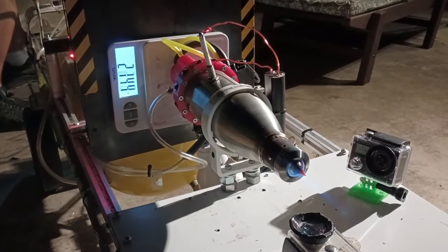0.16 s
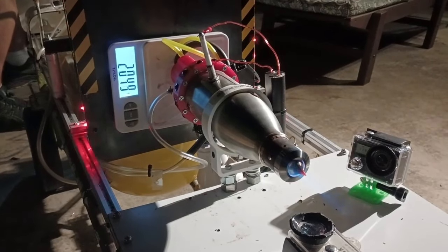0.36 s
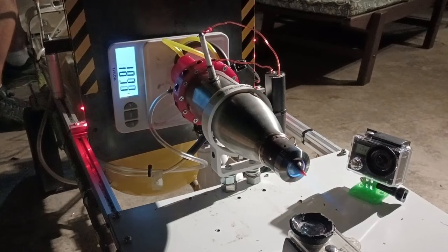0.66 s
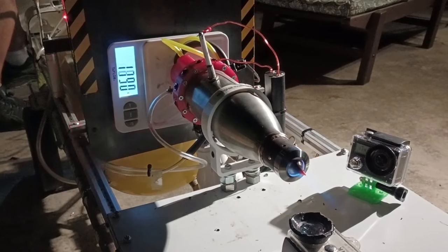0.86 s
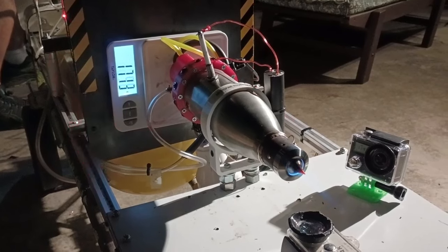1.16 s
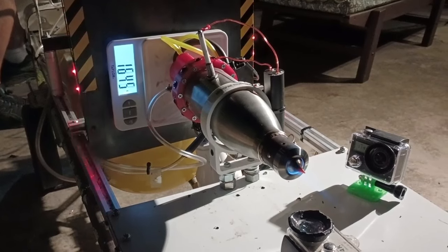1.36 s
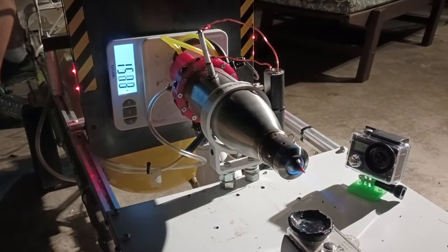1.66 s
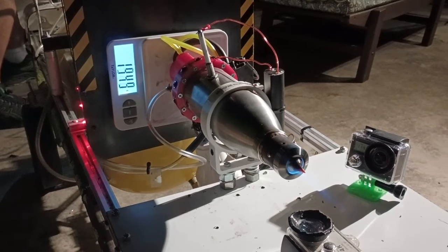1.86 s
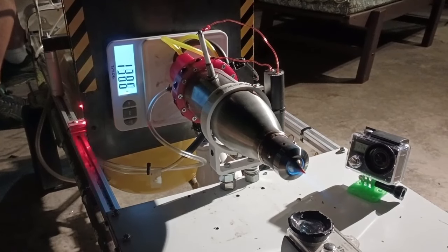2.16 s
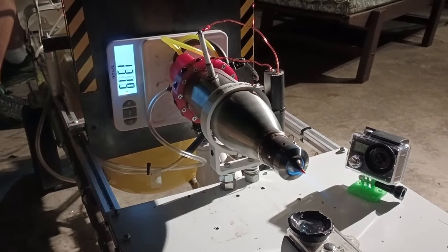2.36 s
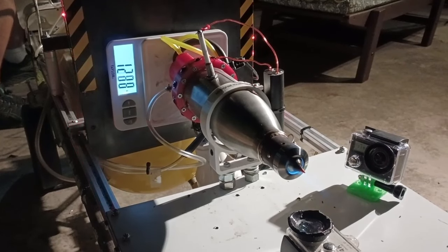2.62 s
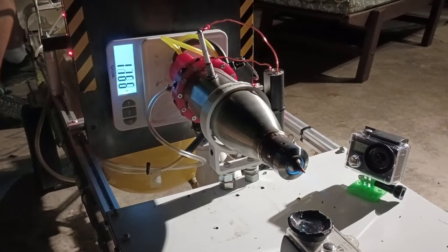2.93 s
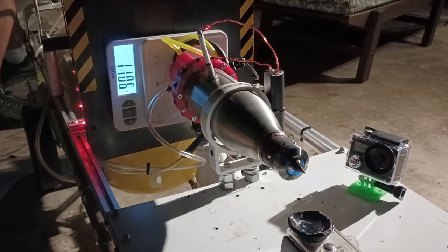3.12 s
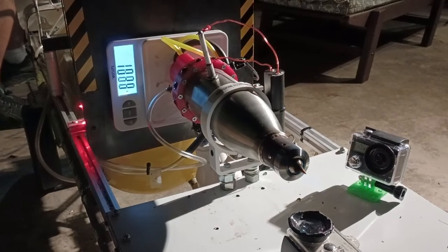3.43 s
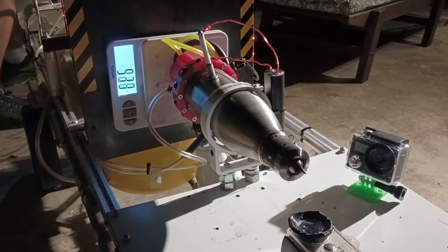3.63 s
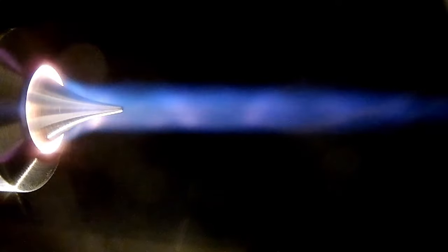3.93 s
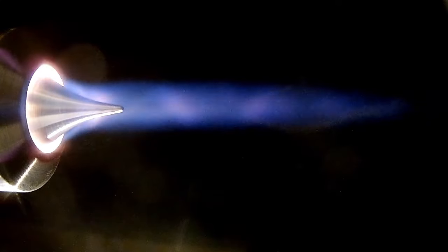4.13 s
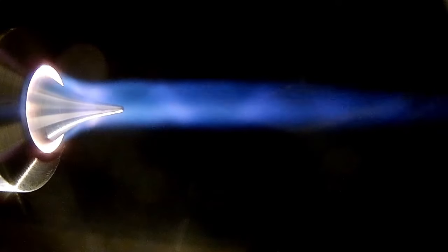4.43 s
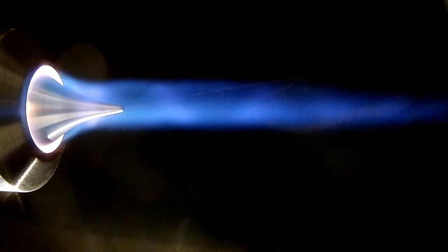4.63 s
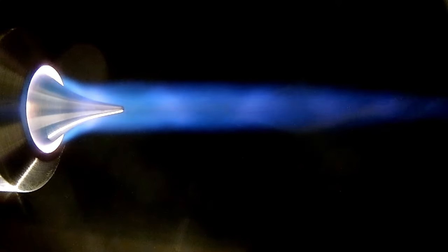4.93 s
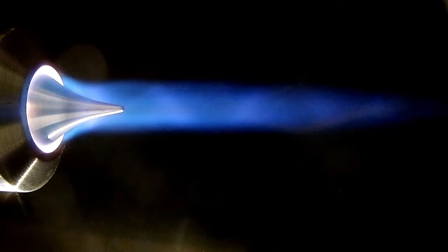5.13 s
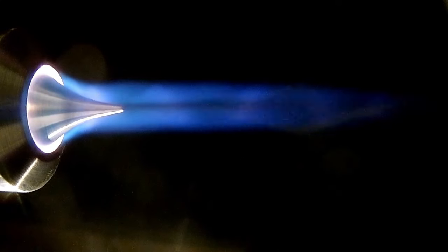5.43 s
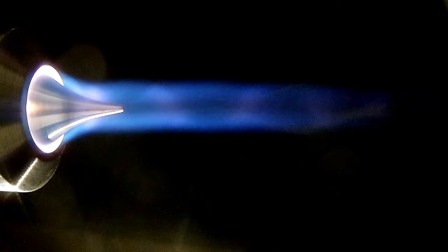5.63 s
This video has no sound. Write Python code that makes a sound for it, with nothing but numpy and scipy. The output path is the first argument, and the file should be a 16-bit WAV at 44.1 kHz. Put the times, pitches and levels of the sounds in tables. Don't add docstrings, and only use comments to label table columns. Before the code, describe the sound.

From 0 to about 3.1 seconds a small rocket engine burns steadily very close to the microphone: a dense, harsh, bright hiss, strongest around six kilohertz, rough with overload and spread across stereo. From 3.1 it flares louder, then at about 3.35 coughs with a small low thump and collapses quickly into a thinning hiss. Near 3.5 the feed line spits a faint spurt and then a strong short puff. Between 3.56 and 3.62 four tiny cooling-metal ticks sound over a quiet whistling gas leak, soft yard noise and a far slow motor beating. At 3.86 everything cuts to near silence. At 3.94 a second firing enters abruptly with a low jolt on the left: a loud, deep, wide, slowed-down roar with no treble, swaying slightly and holding almost constant to 6 seconds, with a few faint isolated specks, clearest near 4.4 and 5.3.

```python
import sys
import numpy as np
from scipy import signal
from scipy.fft import rfft, irfft, next_fast_len
from scipy.io import wavfile
from scipy.ndimage import uniform_filter1d, map_coordinates

SR = 44100
rng = np.random.default_rng(int(sys.argv[2]) if len(sys.argv) > 2 else 0)


def decibels_to_gain(level_db):
    exponent = np.asarray(level_db, float) / 20
    return 10 ** exponent


def persist_wave(psi):
    counts = np.round(np.clip(psi, -1, 1) * 32767).astype(np.int16)
    wavfile.write(sys.argv[1], SR, np.atleast_2d(counts).T)


N = 254898
CAMERA_TOP_HZ = 15740


def unit(x):
    return x / np.sqrt(np.mean(x ** 2) + 1e-20)


def along(points, hz):
    f, *cols = np.transpose(points)
    return np.squeeze([np.interp(np.log(hz + 1), np.log(f + 1), c) for c in cols])


def filtered(x, response):
    m = next_fast_len(N + SR // 4)
    return irfft(rfft(x, m) * response(np.fft.rfftfreq(m, 1 / SR)), m)[..., :N]


def wobble(every):
    knots = rng.standard_normal(N // every + 4)
    return map_coordinates(knots, [np.arange(N) / every])


def patchy(depth_db):
    z = signal.stft(rng.standard_normal((2, N)), nperseg=512)[2]
    field = uniform_filter1d(rng.standard_normal(z.shape[1:]), size=8, axis=0)
    field = uniform_filter1d(field, size=6, axis=1)
    return signal.istft(z * decibels_to_gain(depth_db * unit(field)), nperseg=512)[1][:, :N]


def at_ports(spectrum, ports, depth_db):
    def mix(hz):
        alike, lead, tilt_db = along(ports, hz)
        alike = np.clip(alike, 0, 1)
        level_db = along(spectrum, hz)
        left = decibels_to_gain(level_db + tilt_db / 2)
        right = decibels_to_gain(level_db - tilt_db / 2)
        return np.array([left, right * alike * np.exp(1j * lead), right * np.sqrt(1 - alike ** 2)])
    left, shared, own = filtered(patchy(depth_db)[[0, 0, 1]], mix)
    return np.array([left, shared + own])


def split(x, edge_hz):
    low = filtered(x, lambda hz: 1 / (1 + (hz / edge_hz) ** 6))
    return unit(low), unit(x - low)


def overload(x, top, hard):
    return x / (1 + np.abs(x / top) ** hard) ** (1 / hard)


FLARE_S, SHUT_S = 3.13, 3.35


def jet_level(offset_db, flare_share, early_s, fall_share, late_s):
    t = np.arange(N) / SR
    line_db = -16
    flare_db = 6.5 * np.clip((t - FLARE_S) / (SHUT_S - early_s - FLARE_S), 0, 1) ** 1.5
    shut = np.clip(t - SHUT_S - late_s, 0, None)
    pressure = decibels_to_gain(-260 * shut) + decibels_to_gain(line_db - 70 * shut)
    fall_db = 20 * np.log10(pressure / (1 + decibels_to_gain(line_db)))
    dry_db = -450 * np.clip(t - 3.545, 0, .2)
    return -42.5 + offset_db + flare_share * flare_db + fall_share * (fall_db + dry_db)


# (frequency [Hz], level per Hz [dB])
JET_SPECTRUM = [(35, -60), (60, -33), (90, -18), (160, -11.5), (900, -12.5), (2300, -10.5), (3500, -6.5),
                (4700, -4.5), (6200, 0.5), (7300, -4), (7900, -9.5), (10000, -13), (13300, -20),
                (14800, -9), (15800, -9.5)]
# (frequency [Hz], likeness [0-1], right port's lead [rad],
# left over right [dB])
JET_PORTS = [(1000, 0.06, 1, 0), (2000, 0.13, -0.5, 0), (3150, 0.3, 1.24, -2.5), (4100, .62, 1.5, 4.5),
             (6400, 0.73, 3, 2.5), (7430, 0.55, 3.5, 4), (8500, 0.41, 4, 0.5), (10000, 0.3, 3.5, -3),
             (13000, .1, 3.5, 1), (15500, 0.11, 2.5, -3)]


def first_firing():
    flow = overload(unit(at_ports(JET_SPECTRUM, JET_PORTS, depth_db=1.33)), top=2.0, hard=4)
    rumble, rest = split(flow, edge_hz=2280)
    jet, fizz = split(rest, edge_hz=7480)
    jet_db = jet_level(3.93, flare_share=1, early_s=0, fall_share=0.94, late_s=0)
    rumble_db = jet_level(-7.0, flare_share=0.69, early_s=0.1, fall_share=0.78, late_s=0)
    fizz_db = jet_level(2.0, flare_share=-0.66, early_s=-0.17, fall_share=0.6, late_s=-0.02)
    thin_treble = decibels_to_gain(-70.5)
    return decibels_to_gain(jet_db) * jet + decibels_to_gain(rumble_db) * rumble + (decibels_to_gain(fizz_db) + thin_treble) * fizz


# (resonance [Hz], width [Hz], level [dB])
LEAK_PIPE = [(3820, 500, -2.5), (4270, 60, 0), (5510, 350, -1.5), (8300, 200, -32), (9300, 212, -22)]
# (frequency [Hz], level per Hz [dB])
YARD_SPECTRUM = [(40, -3), (300, 0.5), (1200, 1.5), (2000, -4.5), (3000, -1), (7500, -7.5), (11000, -21),
                 (14000, -20), (15500, -14.5)]
# (frequency [Hz], level [dB])
MOTOR_ORDERS = [(28, -105), (83, -83), (140, -83.5), (167, -84), (194, -75), (230, -77.5), (330, -85),
                (500, -82), (1000, -86.5), (1500, -105)]


def background():
    t = np.arange(N) / SR

    def pipe(f):
        modes = sum(decibels_to_gain(db) * f * w / np.hypot(c * c - f * f, f * w) for c, w, db in LEAK_PIPE)
        return modes ** 2.2

    leak = decibels_to_gain([[-56], [-64]]) * unit(filtered(patchy(.6), pipe))
    yard = decibels_to_gain(-68) * unit(filtered(patchy(2.5), lambda hz: decibels_to_gain(along(YARD_SPECTRUM, hz))))

    hz = 27.8 * np.arange(1, 55)[:, None]
    sizes = decibels_to_gain(along(MOTOR_ORDERS, hz[:, 0]) - 1.0 + rng.normal(0, 1.66, len(hz)))
    phase = 2 * np.pi * hz * (t[::8] - 3.6795) + rng.normal(0, .9, hz.shape)
    beat = signal.resample_poly(sizes @ np.cos(phase), 8, 1)[:N]
    motor = np.array([beat, np.roll(beat, 18)])

    duck_db, open_db = -4.5, 1.4
    recovery = np.clip((t - 3.63) / .045, 0, 1)
    return decibels_to_gain(duck_db + (open_db - duck_db) * recovery) * (leak + yard + motor)


def thump():
    t = np.arange(N) / SR - 3.308
    return decibels_to_gain(-49) * np.exp(-(t / .009) ** 2) * np.sin(2 * np.pi * 115 * t)


# (frequency [Hz], level per Hz [dB])
LAST_GAS_SPECTRUM = [(100, -21), (400, -8.5), (1500, -8.5), (2500, -5), (4000, -2.5), (6200, 8),
                     (7600, -9.5), (10000, -16), (13000, -23), (15000, -18)]
# (time [s], peak level [dB], hold [s])
SPURTS = [
    (3.492, -55, .002),
    (3.519, -38.5, .008),
]


def last_gas():
    t = np.arange(N) / SR
    gain = decibels_to_gain(-70 - 130 * np.clip(t - 3.64, 0, None)) * (t > SHUT_S)
    for s, db, hold in SPURTS:
        rise_db = 6000 * np.clip(s - t, 0, .1)
        fall_db = 900 * np.clip(t - s - hold, 0, .2)
        gain = gain + decibels_to_gain(db - rise_db - fall_db)
    sputter_db = 2.5 * wobble(every=100)
    return gain * decibels_to_gain(4.5 + sputter_db) * unit(at_ports(LAST_GAS_SPECTRUM, JET_PORTS, depth_db=1.2))


# (frequency [Hz], level [dB], 60 dB decay [s])
NOZZLE_MODES = [(6360, -7, 0.035), (5900, -9, 0.019), (6840, -7.5, .015)]
# (time [s], peak level [dB])
TICKS = [
    (3.5624, -51),
    (3.5784, -52),
    (3.5939, -45.5),
    (3.6124, -50),
]


def ticks():
    out = np.zeros(N)
    t = np.arange(SR // 20) / SR
    for s, db in TICKS:
        ring = decibels_to_gain(-11.5 - 60 * t / .015) * rng.standard_normal(len(t))
        for hz, level, t60 in NOZZLE_MODES:
            ring = ring + decibels_to_gain(level + rng.normal(0, 2) - 60 * t / t60) * np.sin(2 * np.pi * hz * t)
        out[round(s * SR):][:len(t)] += decibels_to_gain(db + 3) * ring * (1 - np.exp(-t / .0004))
    return out * decibels_to_gain([[1.5], [-1.5]])


def starved(x, under_db, scatter_db):
    hz, _, z = signal.stft(x, SR, nperseg=2048)
    level = uniform_filter1d(np.abs(z) ** 2, size=12, axis=1)
    chance = uniform_filter1d(rng.standard_normal(z.shape[1:]), size=12, axis=0)
    mask = level.max(axis=1, keepdims=True) * decibels_to_gain(2 * (under_db + scatter_db * unit(chance)))
    heard = (level > mask) | (hz[:, None] < 7500)
    return signal.istft(z * heard, SR, nperseg=2048)[1][:, :N]


# (frequency [Hz], level per Hz [dB])
ROAR_SPECTRUM = [(12, -29.5), (20, -1), (49, -0.5), (317, -2.5), (500, -5.5), (729, -7.5), (1220, -15.5),
                 (1710, -20.5), (2190, -22), (3020, -16.5), (3430, -19.5), (3900, -16.5), (4260, -19),
                 (4400, -20.5)]
# (frequency [Hz], likeness [0-1], right port's lead [rad],
# left over right [dB])
ROAR_PORTS = [(1400, .03, 0.89, 1), (2000, .2, 4.6, 1.5), (2850, 0.4, 3.93, 5), (3440, 0.054, 5.4, -4),
              (3730, 0.4, 8.6, 3), (4300, 0.38, 6.6, 0.5)]
# (time [s], level [dB], port [0 left, 1 right])
SPECKS = [
    (4.072, -57, 1),
    (4.094, -57, 0),
    (4.257, -58, 0),
    (4.373, -49, 0),
    (4.393, -46, 0),
    (4.8, -59, 1),
    (5.29, -49, 1),
    (5.58, -52, 0),
]


def slowed_firing():
    low, high = split(at_ports(ROAR_SPECTRUM, ROAR_PORTS, depth_db=0.47), edge_hz=2670)
    low_db = -21.5 + 0.44 * wobble(every=3000)
    roar = overload(decibels_to_gain(low_db) * low + decibels_to_gain(-30.0) * high, top=.4, hard=2.9)
    roar = filtered(roar, lambda hz: 1 / (1 + (hz / 4268) ** 600))
    specks = np.zeros((2, N))
    for s, db, port in SPECKS:
        specks[port, round(s * SR)] = decibels_to_gain(db + 26.0)
    return roar + filtered(specks, lambda hz: np.exp(-((hz - 3900) / 1100) ** 2))


def scene():
    t = np.arange(N) / SR
    out_s, in_s = 3.8597, 3.94128

    def camera_band(hz):
        return (hz < CAMERA_TOP_HZ) / (1 + (45 / (hz + 1)) ** 4)

    stand = first_firing() + background() + thump() + last_gas() + ticks()
    first = starved(filtered(stand, camera_band), under_db=-29.5, scatter_db=3.0)

    since = np.clip(t - in_s, 0, None)
    swing = -.33 * np.exp(-(since / 0.0014) ** 2) * (t >= in_s)
    second = slowed_firing() * (1 - np.exp(-since / 0.00055)) + swing * [[1], [0]]

    hiss = filtered(patchy(.5), lambda hz: (hz > 8300) & (hz < CAMERA_TOP_HZ))
    return first * (t < out_s) + second + decibels_to_gain(-98) * unit(hiss)


def band_limit(x):
    return signal.sosfilt(signal.butter(12, 17100, fs=SR, output="sos"), x)


def record(dry):
    return band_limit(dry)


dry = scene()
out = record(dry)
persist_wave(out)
```